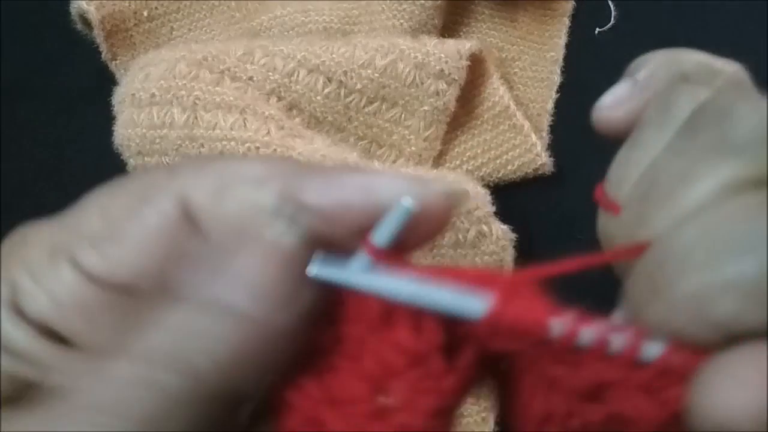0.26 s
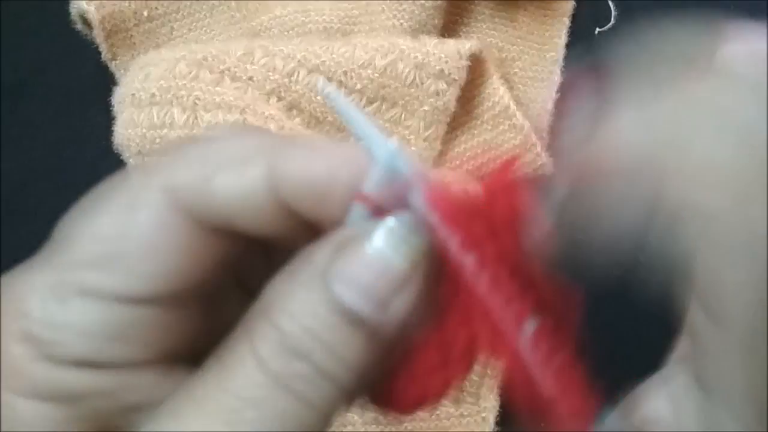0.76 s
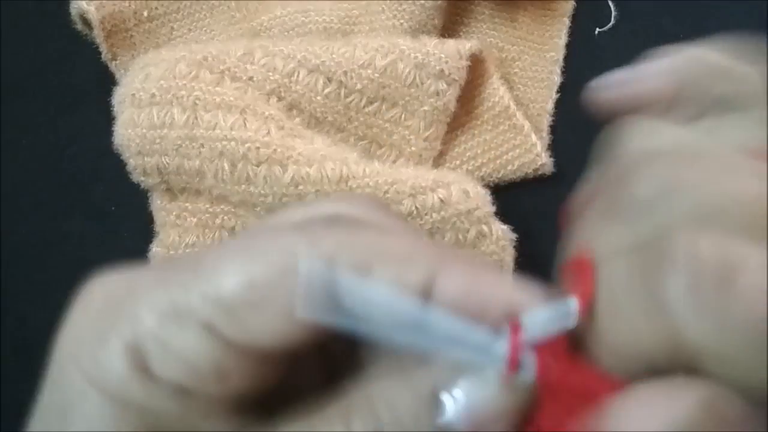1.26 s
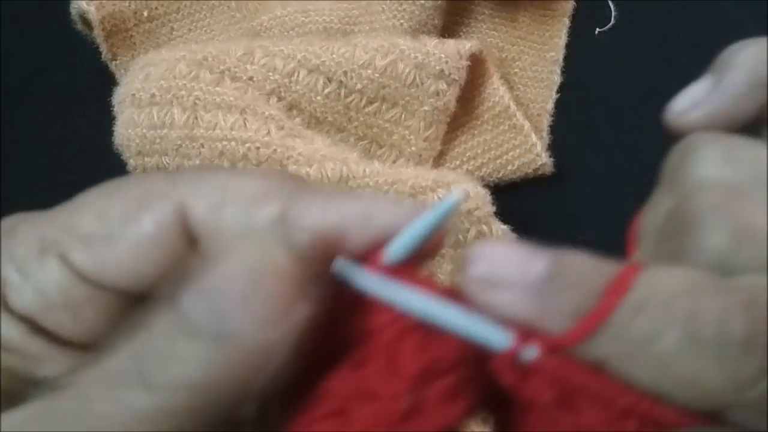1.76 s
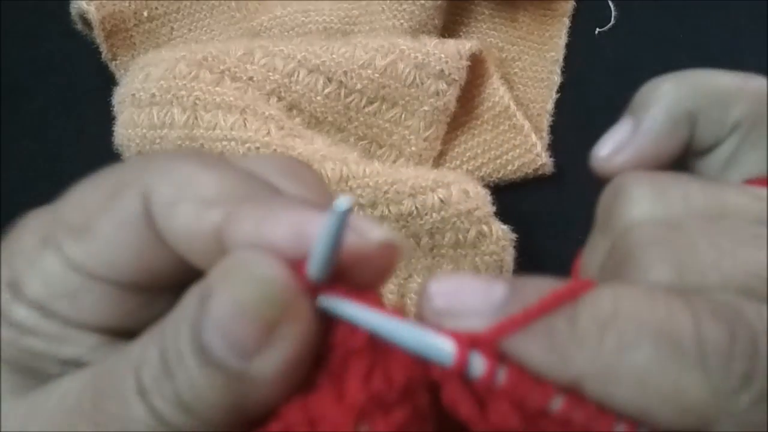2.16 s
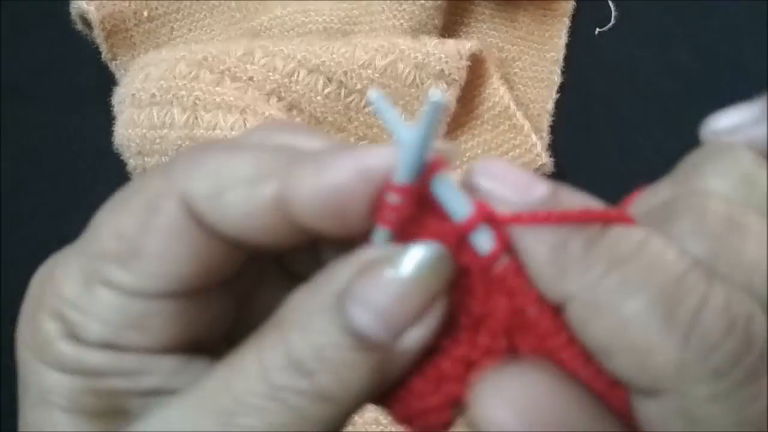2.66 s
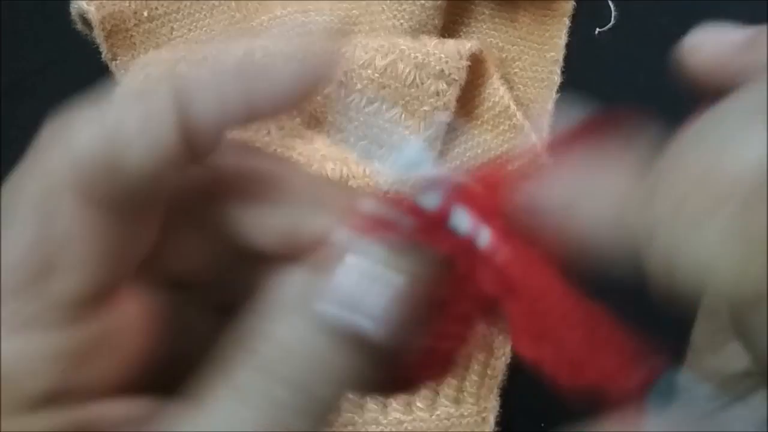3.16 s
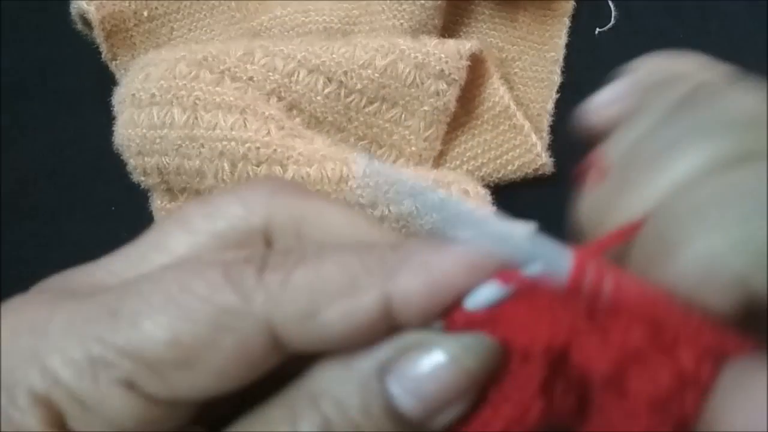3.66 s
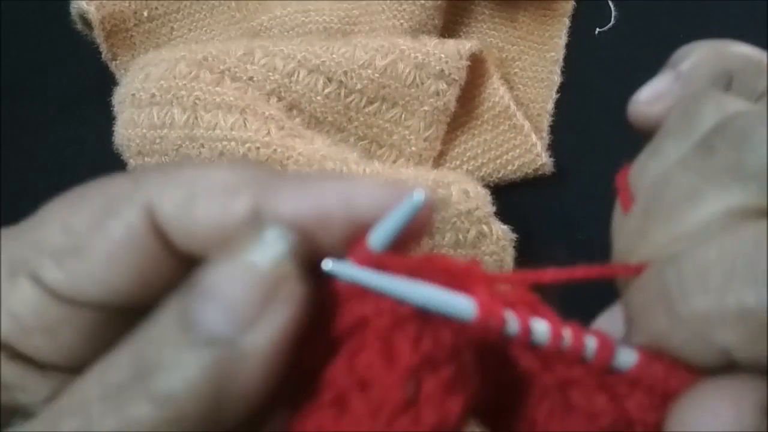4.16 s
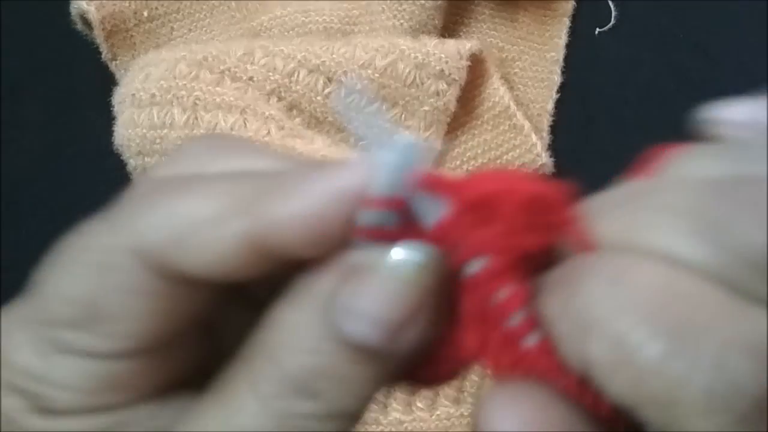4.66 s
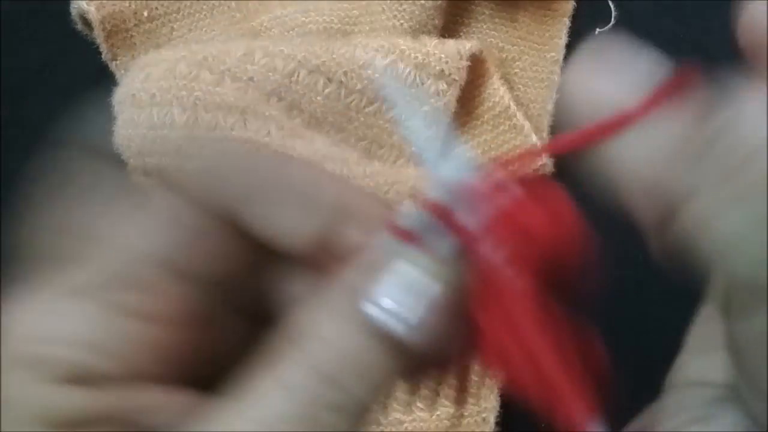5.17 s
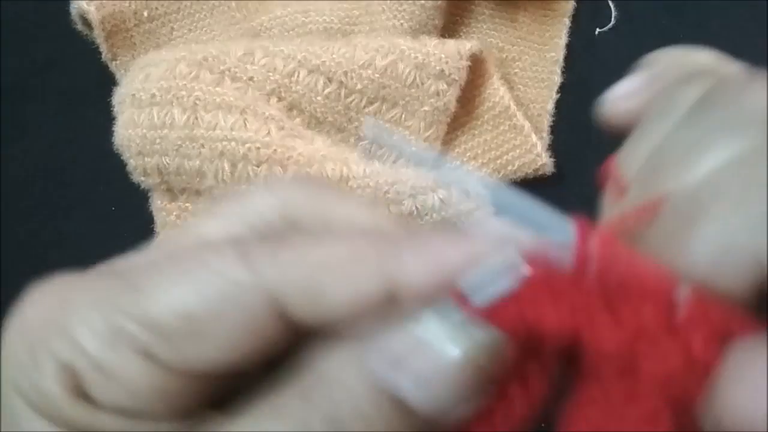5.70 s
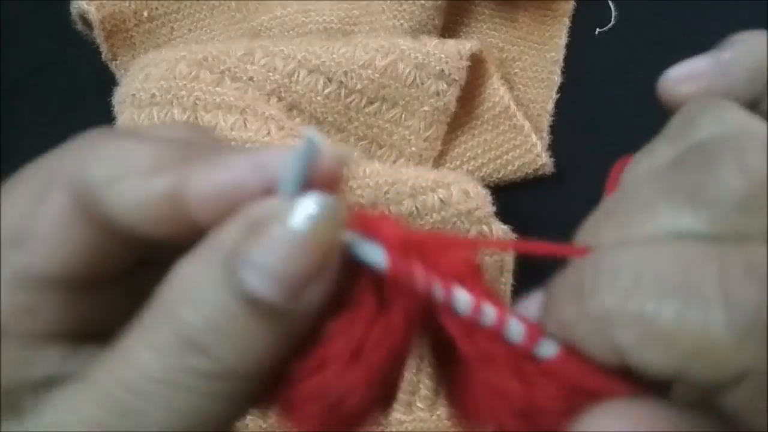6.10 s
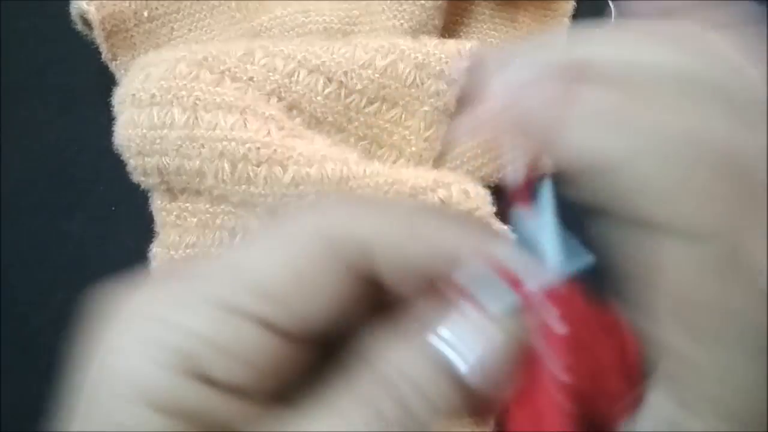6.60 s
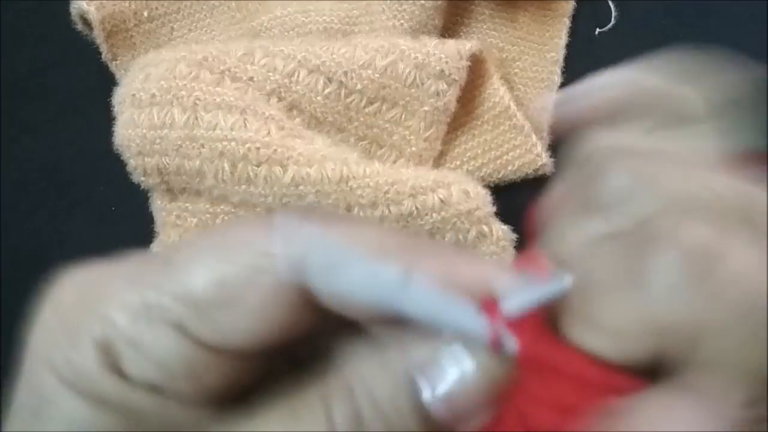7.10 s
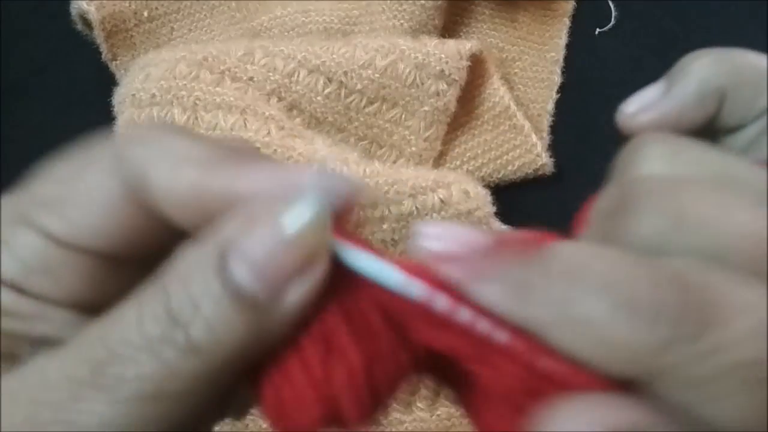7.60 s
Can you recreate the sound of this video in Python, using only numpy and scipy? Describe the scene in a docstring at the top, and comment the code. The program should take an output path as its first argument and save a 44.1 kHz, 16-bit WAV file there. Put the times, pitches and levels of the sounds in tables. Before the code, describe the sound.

Close to the microphone in a small room, two metal knitting needles tick irregularly, bright and very short, a few clicks much louder than the rest. Wool brushes over them in faint hissy swishes. A low engine drone fades within the first second, traffic rumble and tyre roar thin out behind, and occasional dull knocks sound in the house.

```python
"""Two metal knitting needles tick against each other, close by in a small room, while wool slides over them.
Outside an engine fades away and traffic rumbles and swishes; a few dull knocks sound somewhere in the house.
Needles are damped sine modes with a noise crack and a room tail; wool is grainy noise in swells.
Knocks are a pulse of air with a dull noise tail; the engine is a sum of sines; street, faint tones and
hiss are shaped noise."""
import sys
import numpy as np
from scipy import signal
from scipy.fft import rfft, irfft, next_fast_len
from scipy.io import wavfile
from scipy.ndimage import uniform_filter1d, map_coordinates

SR = 44100
rng = np.random.default_rng(int(sys.argv[2]) if len(sys.argv) > 2 else 0)


def store_wav(level_fs):
    """Save 16-bit WAV to argv[1]."""
    pcm = np.round(np.clip(np.atleast_2d(level_fs), -1, 1) * 32767)
    wavfile.write(sys.argv[1], SR, pcm.T.astype(np.int16))


N = 345957


def amp(db):
    """Decibels to amplitude."""
    return 10 ** (np.asarray(db) / 20)


def unit(x):
    """Scale to rms 1."""
    return x / np.sqrt(np.mean(x ** 2) + 1e-20)


def along(points, hz):
    """Interpolate (hz, value) points on a log frequency axis."""
    point_hz, value = np.transpose(points)
    return np.interp(np.log(hz + 1), np.log(point_hz + 1), value)


def curves(rows):
    """One value per sample for each column after the time."""
    time_s, *columns = np.transpose(rows)
    return [np.interp(np.arange(N) / SR, time_s, column) for column in columns]


def wobble(rate_hz):
    """Smooth random curve with rate_hz knots a second."""
    knots = rng.standard_normal(int(N * rate_hz / SR) + 4)
    return map_coordinates(knots, [np.arange(N) * rate_hz / SR])


def sides(pan_db):
    """Left and right gains for a left-right difference."""
    return amp([pan_db / 2, -pan_db / 2])


def filtered(x, response):
    """Multiply the spectrum of x by a response of frequency."""
    m = next_fast_len(x.shape[-1] + 8192)
    spectrum = rfft(x, m) * response(np.fft.rfftfreq(m, 1 / SR))
    return irfft(spectrum, m)[..., :x.shape[-1]]


def rush(spectrum, alike, patchy_db, grain_db=0, size=512):
    """Stereo noise of rms 1 with patches of random gain (long and narrow for a large size) and ms grains."""
    grains = rng.standard_normal((2, N)) * amp(grain_db * wobble(740))
    z = signal.stft(grains, nperseg=size)[2]
    field = uniform_filter1d(rng.standard_normal(z.shape[1:]), size=2, axis=0)
    field = uniform_filter1d(field, size=8, axis=1)
    pair = signal.istft(z * amp(patchy_db * unit(field)), nperseg=size)[1][:, :N]

    def mid_side_response(hz):
        # the mid-side balance sets the left-right correlation
        turn = np.arccos(np.clip(along(alike, hz), -1, 1)) / 2
        return amp(along(spectrum, hz)) * [np.cos(turn), np.sin(turn)]

    mid, side = filtered(pair, mid_side_response)
    return unit(np.array([mid + side, mid - side]))


def room_tail():
    """Fresh stereo noise tail, left energy 1; each frequency dies at its own speed."""
    # room decay: hz, t60_s
    room = [(300, 0.3), (3000, 0.084), (15500, 0.064)]
    hz, t, z = signal.stft(rng.standard_normal((2, SR // 3)), SR, nperseg=256)
    decay = amp(-60 * t / along(room, hz)[:, None])
    tail = signal.istft(z * decay, SR, nperseg=256)[1][:, :SR // 3]
    return tail / np.linalg.norm(tail[0])


def ring(modes, low_db, t):
    """Damped modes, random in strength and about a quarter turn apart at the ports; the grip shifts them."""
    low_modes_hz = 8600  # modes under this vary in strength with the point of contact
    grip = 1 + .01 * rng.standard_normal(len(modes))
    out = 0
    for (hz, db, t60_s), shift in zip(modes, grip):
        level_db = db + low_db * (hz < low_modes_hz) + 1.5 * rng.standard_normal((2, 1))
        phase_turns = np.array([[-.125], [.125]]) + .04 * rng.standard_normal((2, 1))
        out = out + amp(level_db - 60 * t / t60_s) * np.sin(2 * np.pi * (hz * shift * t + phase_turns))
    return out


def needles():
    """Every contact rings both needles and the room answers; three contacts also give a broad low click."""
    # needle contacts: start_s, peak_db (before pan), low_modes_db, left_right_db, right_needle_share (0-1)
    ticks = [(.415, -39.5, 0, 0, 0.75), (0.6567, -30.5, 4, -11.5, 0.55), (1.0189, -29, -4, -11.5, 0.64),
             (1.1439, -15.5, 8.5, -0.5, 0.35), (1.3822, -37.5, 3, -2, 0.6), (2.775, -48, 2, -12.5, 0.8),
             (3.2711, -15.5, -7, -4, 0.62), (3.285, -36, -4, 2, 0.7), (3.4, -29.5, 8.5, -2, 0.6),
             (3.7114, -44, -5.5, -8, 0.84), (3.967, -46, -5.5, -10, 0.45), (4.5854, -46, -6.5, -2, 0.4),
             (4.653, -44, -12, -16, 0.97), (5.3668, -17, 5, 6, 0.56), (6.3105, -48, -4, -15, 0.5),
             (6.8309, -15.5, 4, 5, 0.73), (7.0261, -36, -18, -12, 0.9), (7.1993, -36, 15.5, -4, 0.63),
             (7.2936, -42, 8, -9, 0.9), (7.4955, -32, 1.5, -9.5, 0.64)]
    # needle modes, damped by fingers and stitches: hz (before grip shift), relative_db, t60_s
    left_needle = [(2300, -29, .004), (5250, -23, .005), (7900, -16, .007), (9770, -6, .009),
                   (11950, -8, .009), (14300, 0, .009), (15600, -8, .005)]
    right_needle = [(3400, -35, .009), (6450, -25, .007), (9400, -6, .003), (11200, -3, .007),
                    (13000, 0, .0055), (15300, 1, .0045)]
    # broad low clicks: centre_s, peak_db (before pan), left_right_db
    clicks = [(.416, -50, 2), (1.144, -25.5, 4), (5.3675, -38, 18.5)]
    out, t = np.zeros((2, N + SR)), np.arange(SR // 40) / SR
    rise = (1 - np.exp(-t / 0.0005)) ** 2
    for start_s, db, low_db, pan_db, share in ticks:
        # third difference: treble-heavy noise
        crack = amp(-60 * t / .004) * np.diff(rng.standard_normal((2, len(t) + 3)), 3)
        left = (1 - share) * ring(left_needle, low_db, t)
        right = share * ring(right_needle, low_db, t)
        steel = rise * (left + right + 0.24 * crack)
        tick = amp(db) * steel / np.abs(steel).max(1, keepdims=True)
        # 200 samples of delay before the room answers
        echo = np.pad(signal.fftconvolve(tick, room_tail(), axes=1), ((0, 0), (200, 0)))
        start = round(start_s * SR)
        out[:, start:start + len(t)] += tick * sides(pan_db)[:, None]
        out[:, start:start + echo.shape[1]] += amp(-18) * echo
    for centre_s, db, pan_db in clicks:
        click = np.exp(-((np.arange(N) / SR - centre_s) / .00007) ** 2)  # flat up to a few kHz
        out[:, :N] += amp(db) * sides(pan_db)[:, None] * click
    return out[:, :N]


def wool():
    """Fibres catch and slip: each stroke is a grainy swell of hiss, quicker up than down, some reaching lower."""
    # strokes over metal and skin: peak_s, length_s, level_db (before pan and snags), low_reach_db
    strokes = [(0.022, 0.13, -57.5, -12), (0.17, 0.48, -65.5, -15), (0.324, 0.025, -53.5, -34),
               (0.575, 0.16, -66, -23), (0.667, 0.096, -61, -13), (0.76, 0.1, -61.5, -17.5),
               (0.877, 0.14, -60.5, -12), (1.023, 0.095, -58, -15.5), (1.167, 0.1, -53, -14.5),
               (1.33, 0.16, -55, -17), (1.501, 0.15, -58.5, -17.5), (1.607, 0.047, -62, -13),
               (1.791, 0.07, -57, -19.5), (1.984, 0.14, -68, -39), (2.514, 0.094, -54, -13),
               (2.778, 0.11, -67.5, -21), (2.868, 0.11, -64, -24), (3.09, 0.22, -65, -18),
               (3.302, 0.054, -53.5, -17.5), (3.403, 0.063, -62.5, -12.5), (3.561, 0.21, -59.5, -18.5),
               (3.967, 0.047, -74.5, -17), (4.19, 0.17, -67.5, -23), (4.291, 0.016, -56, -47),
               (4.578, 0.18, -70, -33.5), (4.71, 0.14, -60.5, -18.5), (4.918, 0.14, -62.5, -21.5),
               (5.067, 0.072, -59, -13), (5.175, 0.094, -65, -19), (5.236, 0.05, -63, -27),
               (5.368, 0.16, -59, -43), (5.399, 0.11, -63, -11.5), (5.583, 0.17, -59.5, -18.5),
               (5.746, 0.63, -72, -30), (5.928, 0.056, -64, -34.5), (6.244, 0.072, -61.5, -27),
               (6.355, 0.13, -58, -17.5), (6.468, 0.11, -62, -26), (6.617, 0.28, -68, -20),
               (6.715, 0.048, -61.5, -25), (6.859, 0.11, -59.5, -16.5), (7.08, 0.24, -57.5, -14.5),
               (7.256, 0.13, -61, -15.5), (7.291, 0.011, -50.5, -21), (7.432, 0.18, -65, -62),
               (7.69, 0.11, -67.5, -25), (7.82, 0.11, -70.5, -37)]
    # noise spectra: hz, relative_db_per_hz
    top_spectrum = [(3500, -45.5), (6000, -31), (9000, -9), (11600, 0.5), (13400, 0.5), (15600, -2),
                    (15950, -42)]
    low_spectrum = [(1500, -33), (2600, -11), (5000, -4.5), (8000, 2), (11000, -40.5)]
    rise_share, slope_db = 0.28, 9  # part of the length spent rising; dB lost over the rise or the fall
    edge = 1.32  # over 1: rounder top, steeper edges
    pan_db = -5  # to the right
    t, top_power, low_power = np.arange(N) / SR, np.zeros(N), np.zeros(N)
    for peak_s, length_s, db, low_db in strokes:
        near = slice(max(round((peak_s - .6) * SR), 0), round((peak_s + .6) * SR))
        before, after = (peak_s - t[near]) / rise_share, (t[near] - peak_s) / (1 - rise_share)
        away = np.where(t[near] < peak_s, before, after) / length_s
        power = amp(db - slope_db * away ** edge) ** 2
        top_power[near] += power
        low_power[near] += power * amp(low_db) ** 2
    fizz = rush(top_spectrum, [(8000, 0.003)], patchy_db=2.5, grain_db=2.2)
    brush = rush(low_spectrum, [(4000, 0)], patchy_db=4.5, grain_db=3)
    snag_db = 1.1 * wobble(30)
    strokes_sound = np.sqrt(top_power) * fizz + np.sqrt(low_power) * brush
    return amp(snag_db) * sides(pan_db)[:, None] * strokes_sound


def knocks():
    """Dull knocks: one push of air, then a noise tail whose top follows the push frequency."""
    # knocks: push_s, push_db (before pan), push_hz, tail_db (before decay), tail_t60_s, push_left_right_db
    blows = [(0.91, -40.5, 196, -47.5, 0.16, -2), (3.968, -49, 610, -62, 0.39, -11),
             (5.098, -46, 172, -50.5, 0.26, -2), (5.3688, -53.5, 980, -68, 0.47, 18),
             (5.7694, -61.5, 484, -72, 0.27, -21), (7.028, -67.5, 450, -72, 0.1, 0.1)]
    out, t = np.zeros((2, N + SR)), np.arange(SR // 3) / SR
    for push_s, db, hz, tail_db, t60_s, pan_db in blows:
        u = 2 * np.pi * hz * t - 3
        pulse = (u * u - 1) * np.exp(-u * u / 2)
        push = amp(db) * pulse * sides(pan_db)[:, None]

        def dull_response(f):
            low_cut = (f / 150) ** 2 / (1 + (f / 150) ** 2)
            return low_cut / (1 + (f / (2 * hz)) ** 4)

        noise = rng.standard_normal((2, len(t))) + rng.standard_normal(len(t))
        dull = unit(filtered(noise, dull_response))
        tail = amp(tail_db - 60 * t / t60_s) * (1 - np.exp(-t / 0.0014)) * dull
        out[:, round((push_s - .5 / hz) * SR):][:, :len(t)] += push + tail
    return out[:, :N]


def engine():
    """Orders of the firing rate, each a little unsteady, dying away."""
    # fade: time_s, level_db (before order levels)
    fade = [(0, -39), (.3, -40), (.45, -49), (.6, -55), (1, -100)]
    # orders: multiple_of_firing_rate, relative_db
    orders = [(0.98, 0), (2, -4), (10 / 3, -21), (4, -22.5), (14 / 3, -20)]
    firing_hz = 68.84
    (db,) = curves(fade)
    turns = np.cumsum(firing_hz + .3 * wobble(4)) / SR
    hum = 0
    for multiple, order_db in orders:
        order = np.sin(2 * np.pi * (multiple * turns + rng.random()))
        hum = hum + amp(order_db + .8 * wobble(8)) * order
    return np.sqrt(2) * amp(db) * hum


def street():
    """Low rumble through the walls, a drone, the roar and swish of passing tyres: four bands of noise."""
    # levels: time_s, deep_rumble_db, drone_db, tyre_roar_db, swish_db
    levels = [(0, -46.5, -57, -51.5, -61), (0.66, -56.5, -57, -55.5, -68), (1.32, -59.5, -58, -61, -67.5),
              (1.65, -58.5, -59, -66, -81), (1.98, -56.5, -54.5, -63, -82), (2.64, -57, -53.5, -61, -73),
              (3.3, -57, -54.5, -59.5, -71), (3.63, -60, -53.5, -65, -74.5),
              (3.96, -62.5, -53.5, -74, -84.5), (4.29, -58.5, -55, -82, -92), (4.95, -58, -62.5, -77, -92),
              (5.28, -56, -55.5, -79, -95), (5.61, -61, -65.5, -80.5, -102), (5.94, -58, -67, -89, -94.5),
              (6.6, -66, -70, -85.5, -100.5), (6.93, -60, -64.5, -77, -84), (7.59, -61.5, -64, -82.5, -100),
              (7.83, -60.5, -63.5, -80, -92)]
    # noise spectra: hz, relative_db_per_hz
    deep_spectrum = [(15, -34), (30, -11.5), (50, 2), (90, -1), (130, -17.5), (200, -120)]
    drone_spectrum = [(70, -120), (100, -0.5), (140, 3), (185, -10), (240, -32), (800, -120)]
    roar_spectrum = [(120, -23), (200, 3), (322, -12.5), (709, -17), (1100, -55)]
    swish_spectrum = [(450, -27.5), (750, -1), (1250, -5), (1450, -8.5), (1680, -5.5), (2150, -13),
                      (2350, -13.5), (4000, -30.5), (8800, -100)]
    # left-right likeness of far sound: hz, correlation (-1 to 1)
    alike = [(40, 0.92), (250, 0.93), (640, 0.43), (1400, -0.27), (4000, -0.29)]
    deep_db, drone_db, roar_db, swish_db = curves(levels)
    deep = amp(deep_db + 0.34 * wobble(13.0)) * rush(deep_spectrum, alike, patchy_db=0.0)
    drone = amp(drone_db + 1.5 * wobble(6)) * rush(drone_spectrum, alike, patchy_db=1.8, size=2048)
    roar = amp(roar_db + .7 * wobble(9.3)) * rush(roar_spectrum, alike, patchy_db=3.5, size=2048)
    swish = amp(swish_db) * rush(swish_spectrum, alike, patchy_db=4.5, size=2048)
    return deep + drone + roar + swish


def tones():
    """Faint narrow noise that flutters under a soft swell, quicker up than down."""
    # tones: start_s, length_s, centre_hz, width_hz, level_db (before swell and flutter)
    faint_tones = [(0.926, 0.14, 602, 35, -61), (2.52, 0.52, 510, 62.4, -69), (2.8, 0.97, 708, 60, -70),
                   (3.13, 0.47, 851, 49, -69), (1.3, 0.23, 412, 32.7, -64.5),
                   (1.48, 0.16, 585, 58.7, -65.5), (3.74, 0.52, 620, 110, -68.5),
                   (4.15, 0.48, 651, 69.4, -79.5), (5.799, 0.27, 630, 60, -79),
                   (6.684, 0.22, 717, 106, -78), (6.681, 0.3, 2940, 170, -87), (7.071, 0.28, 3185, 44, -81),
                   (7.299, 0.44, 3188, 45, -83.5), (7.302, 0.22, 2810, 70, -89),
                   (7.661, 0.46, 620, 48.5, -79), (7.687, 0.13, 316, 49.4, -74.5)]
    out = np.zeros((2, N + SR))
    for start_s, length_s, hz, width_hz, db in faint_tones:
        noise = rng.standard_normal((2, SR)) + rng.standard_normal(SR)  # partly shared by both sides
        band = unit(filtered(noise, lambda f: np.exp(-((f - hz) / width_hz) ** 2)))
        swell = np.sin(np.pi * np.clip(np.arange(SR) / SR / length_s, 0, 1) ** .7)
        flutter_db = 3 * wobble(18)[:SR]
        out[:, round(start_s * SR):][:, :SR] += amp(db + flutter_db) * swell * band
    return out[:, :N]


def hiss():
    """Faint patchy noise at a constant level, nearly independent left and right."""
    # noise spectrum: hz, relative_db_per_hz
    spectrum = [(120, -39), (200, -4), (388, -15), (3170, -34.5), (6990, -41), (11100, -21.5),
                (15100, -27.5), (16000, -52.5)]
    return amp(-84.0) * rush(spectrum, [(1000, 0.0044)], patchy_db=8.5, size=2048)


def scene():
    """Sum of all sources."""
    return needles() + wool() + knocks() + engine() + street() + tones() + hiss()


def record(dry):
    """Each microphone port colours the treble its own way; nothing is kept above the band limit."""
    # difference of the two ports: hz, left_right_db
    ports = [(2000, 0.5), (4500, 0), (8000, -3.5), (11000, -11), (13500, 5)]
    top_hz, fade_hz = 16950, 500

    def port_response(hz):
        band_edge = np.clip((top_hz - hz) / fade_hz, 0, 1) ** 2
        return sides(along(ports, hz)) * band_edge

    return filtered(dry, port_response)


dry = scene()
out = record(dry)
store_wav(out)
```